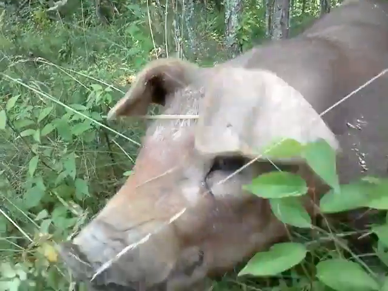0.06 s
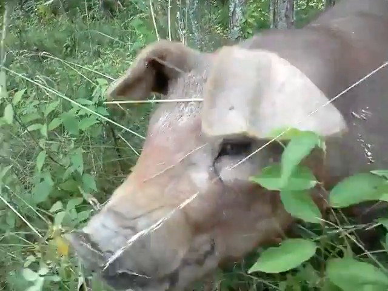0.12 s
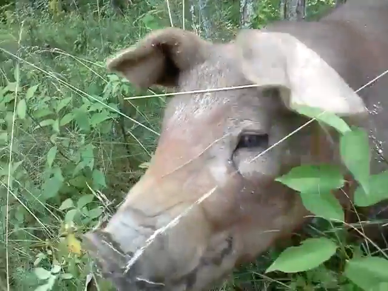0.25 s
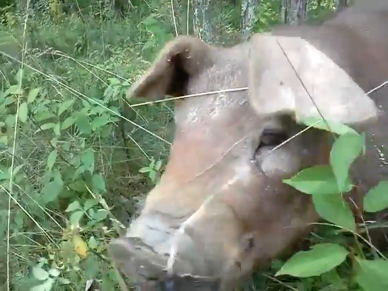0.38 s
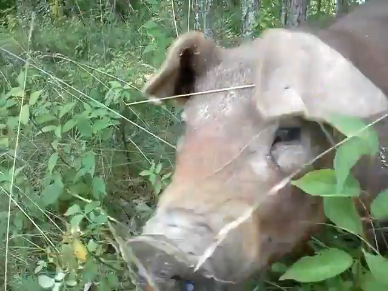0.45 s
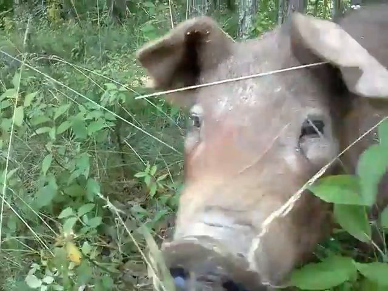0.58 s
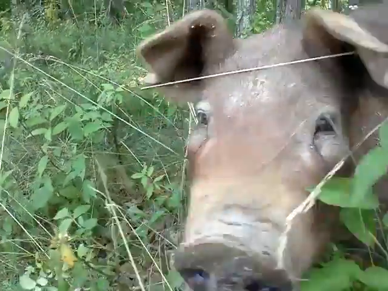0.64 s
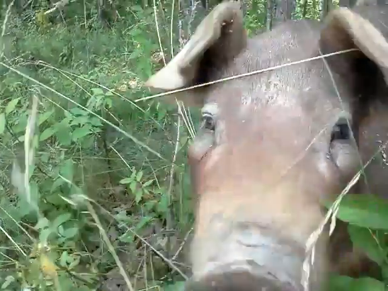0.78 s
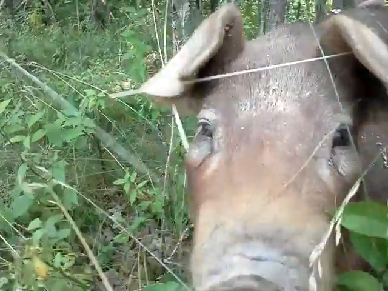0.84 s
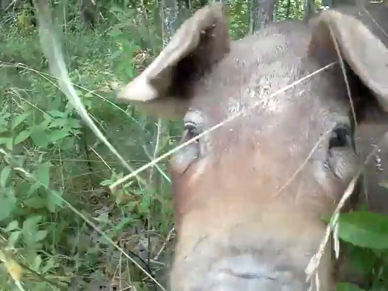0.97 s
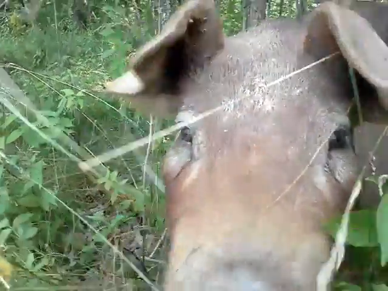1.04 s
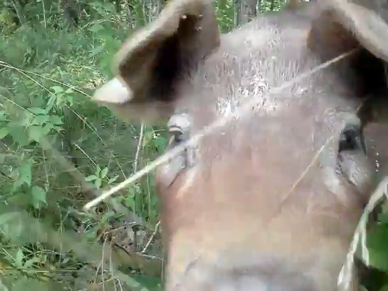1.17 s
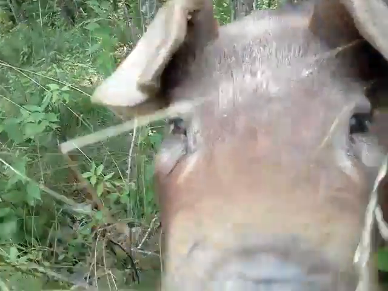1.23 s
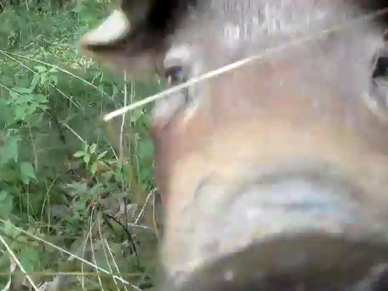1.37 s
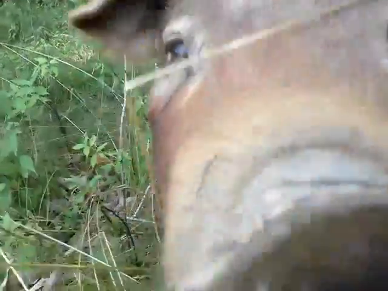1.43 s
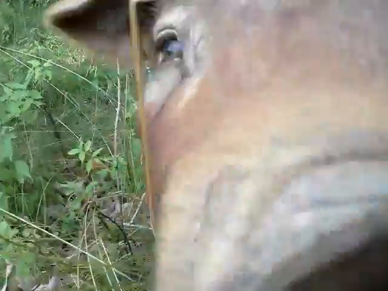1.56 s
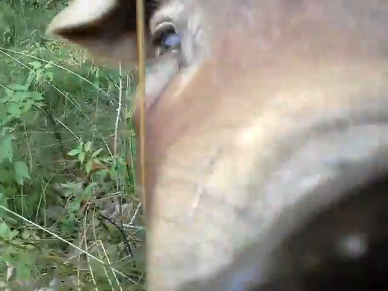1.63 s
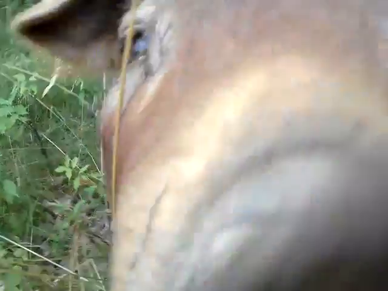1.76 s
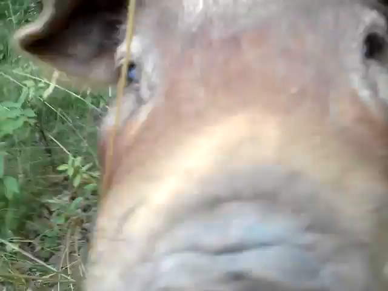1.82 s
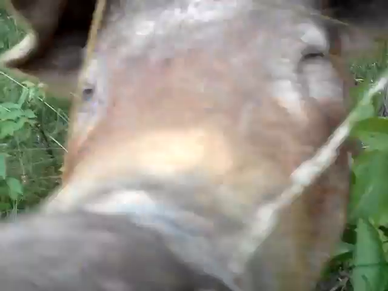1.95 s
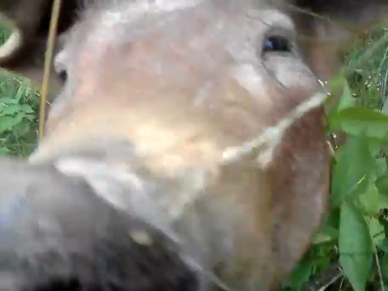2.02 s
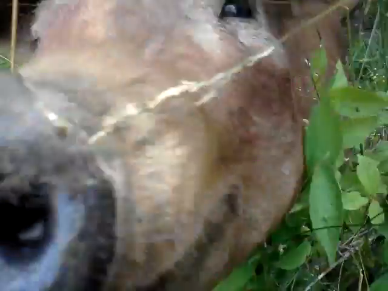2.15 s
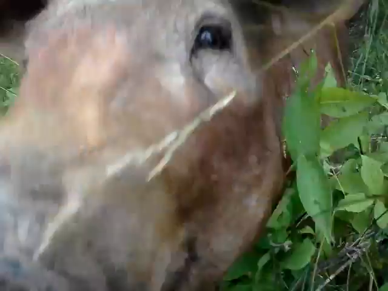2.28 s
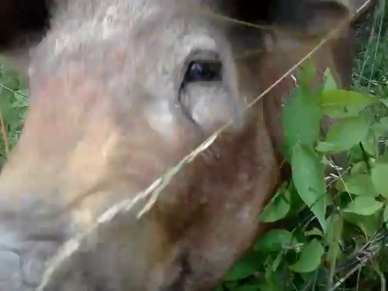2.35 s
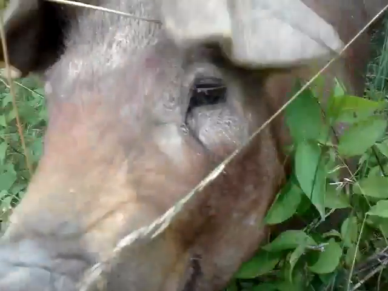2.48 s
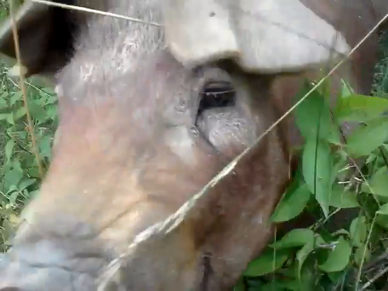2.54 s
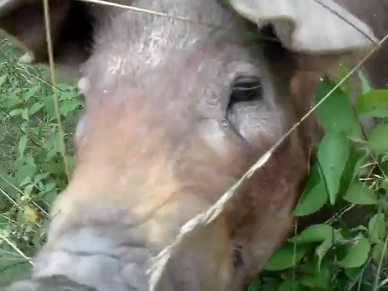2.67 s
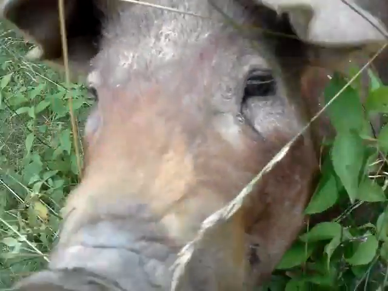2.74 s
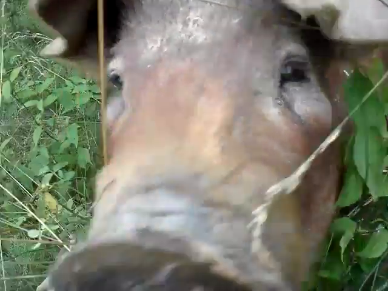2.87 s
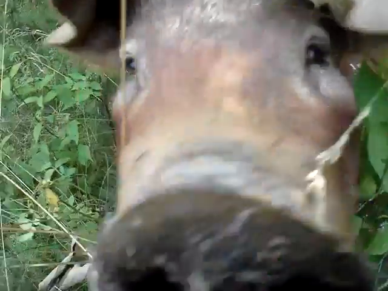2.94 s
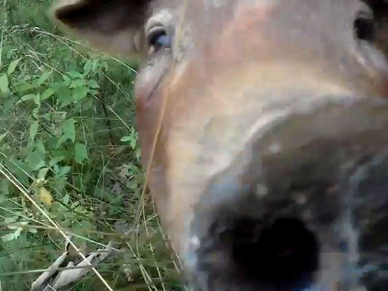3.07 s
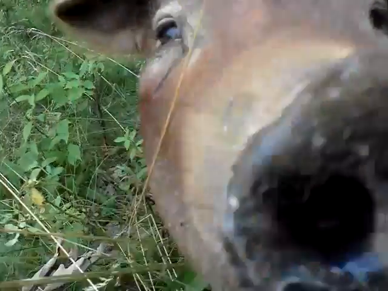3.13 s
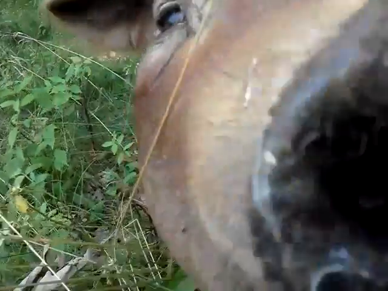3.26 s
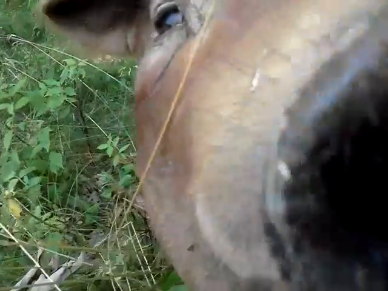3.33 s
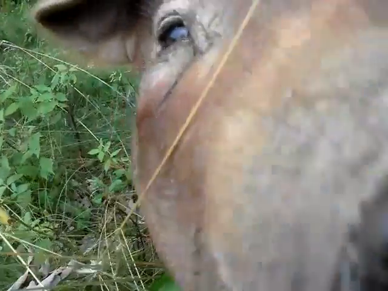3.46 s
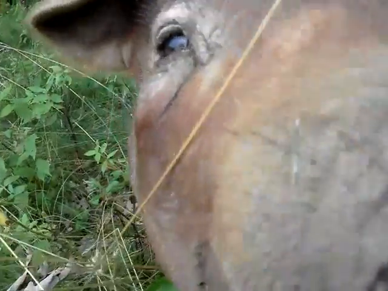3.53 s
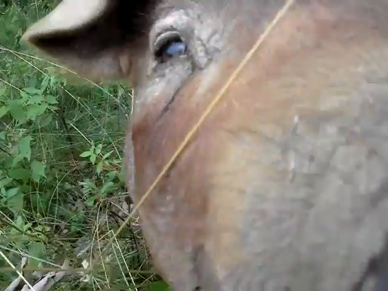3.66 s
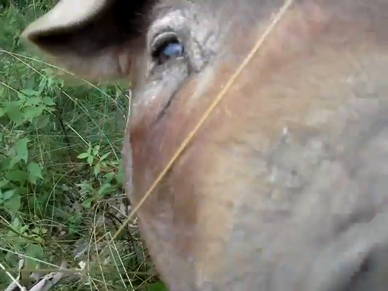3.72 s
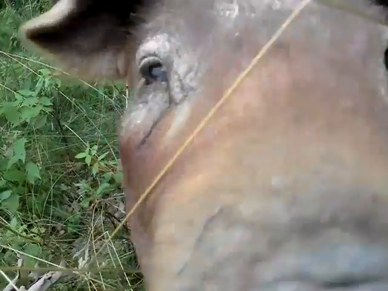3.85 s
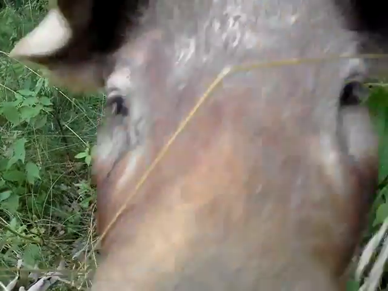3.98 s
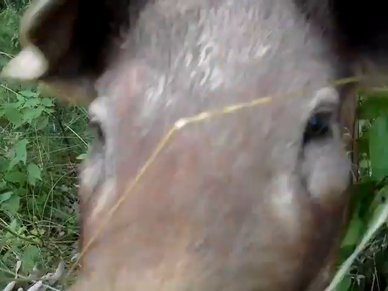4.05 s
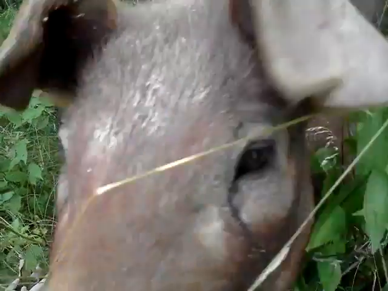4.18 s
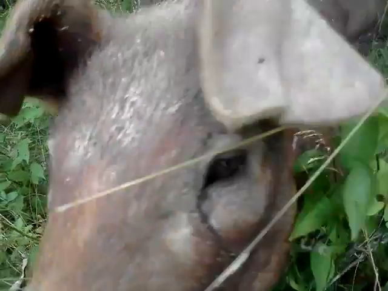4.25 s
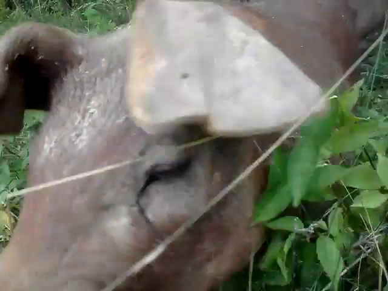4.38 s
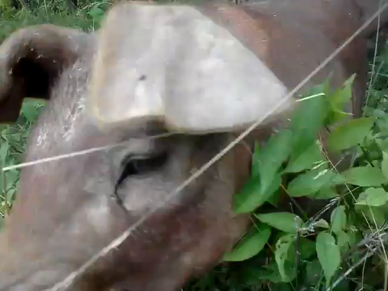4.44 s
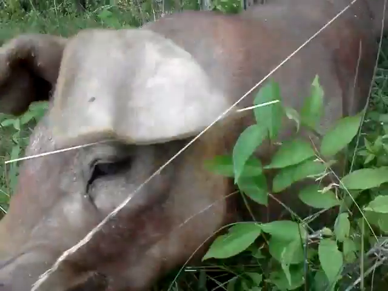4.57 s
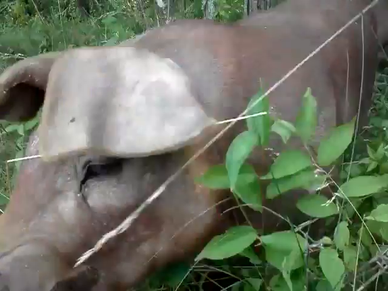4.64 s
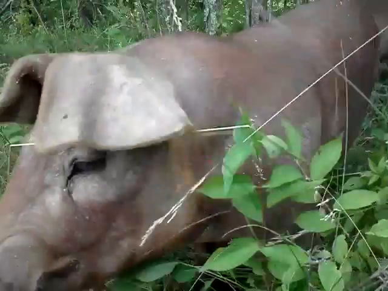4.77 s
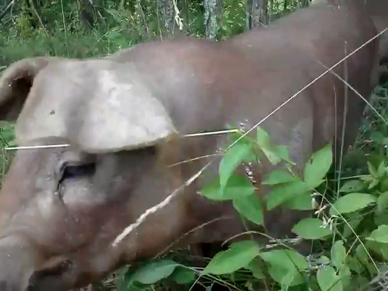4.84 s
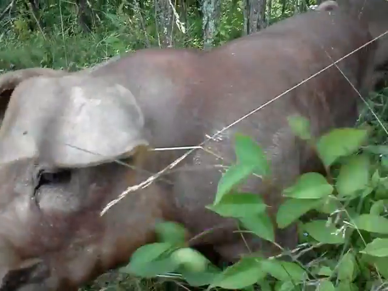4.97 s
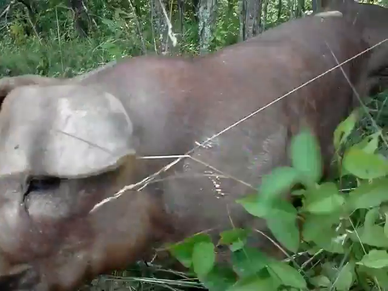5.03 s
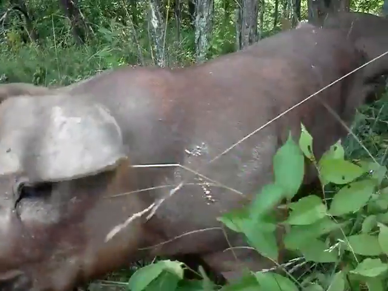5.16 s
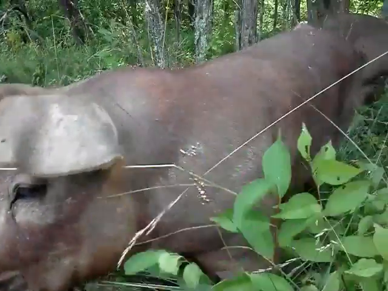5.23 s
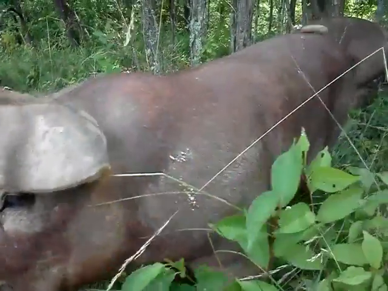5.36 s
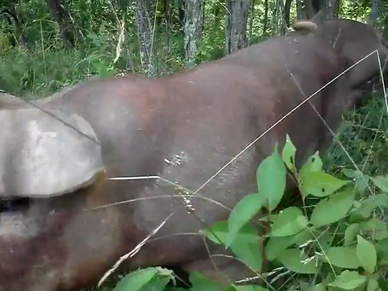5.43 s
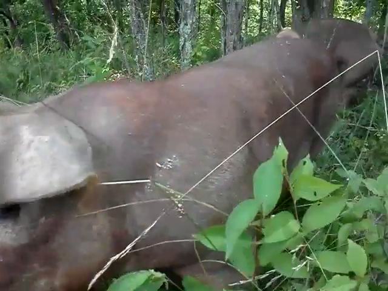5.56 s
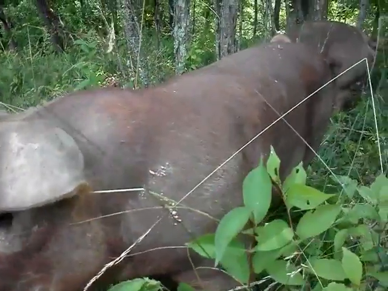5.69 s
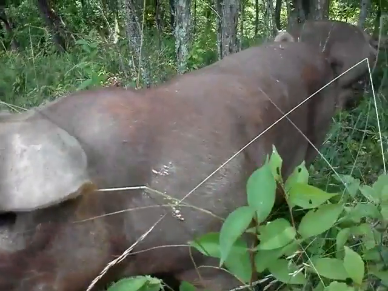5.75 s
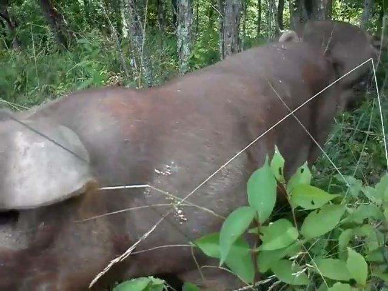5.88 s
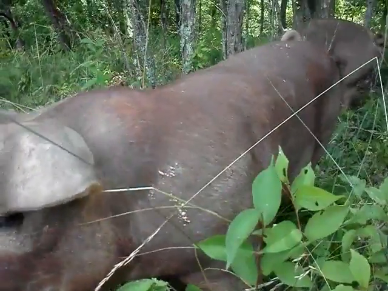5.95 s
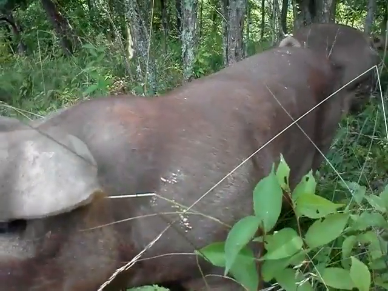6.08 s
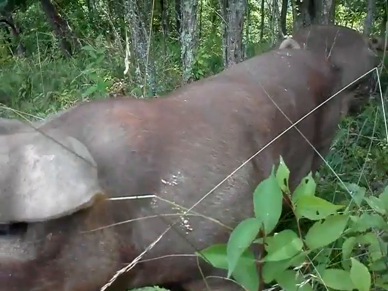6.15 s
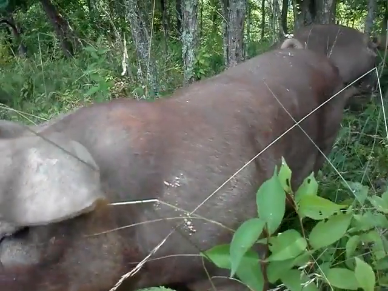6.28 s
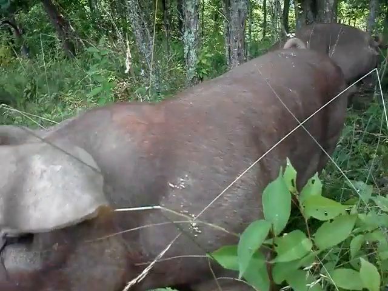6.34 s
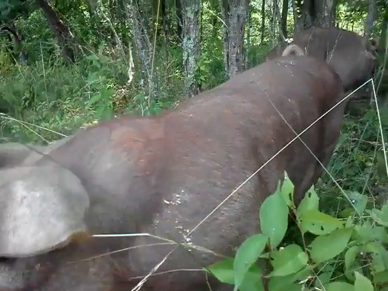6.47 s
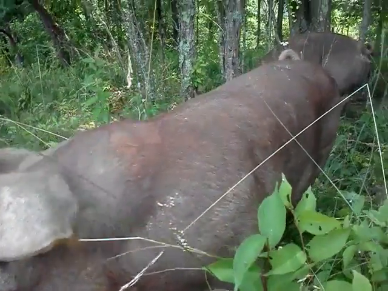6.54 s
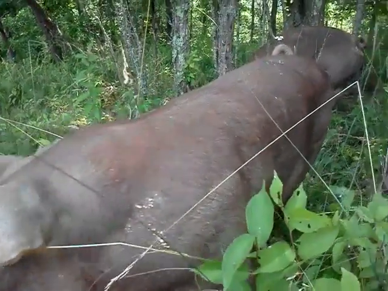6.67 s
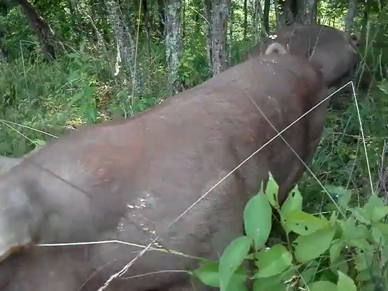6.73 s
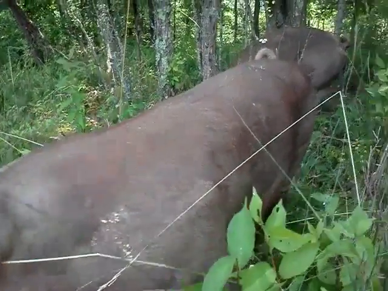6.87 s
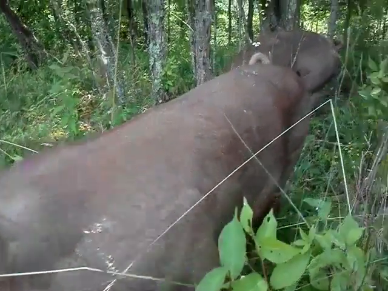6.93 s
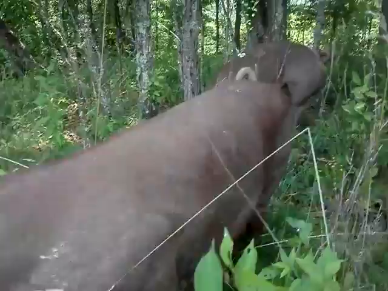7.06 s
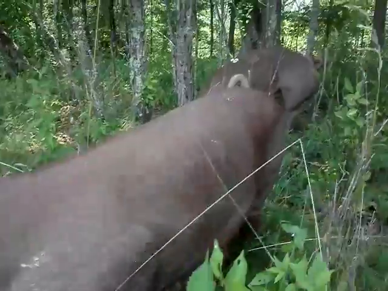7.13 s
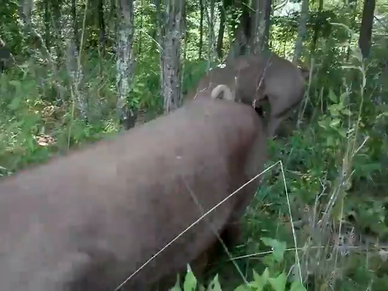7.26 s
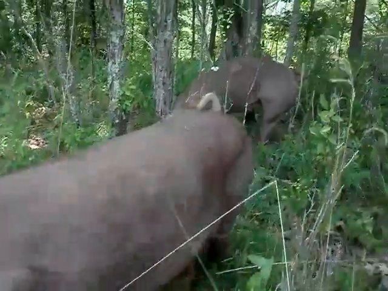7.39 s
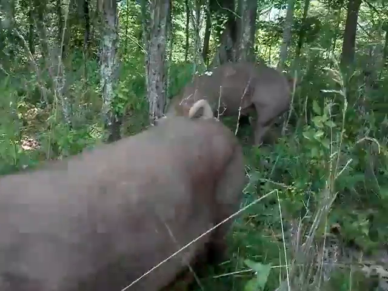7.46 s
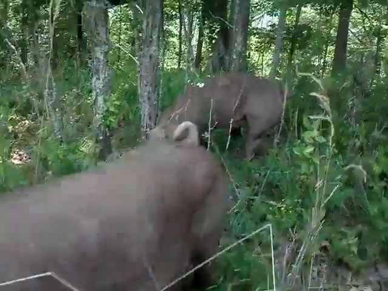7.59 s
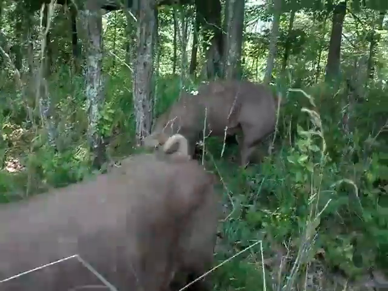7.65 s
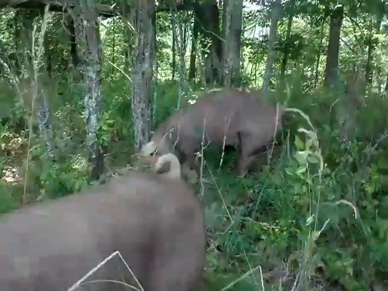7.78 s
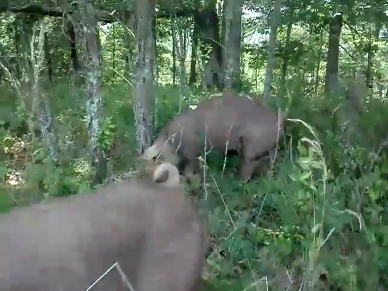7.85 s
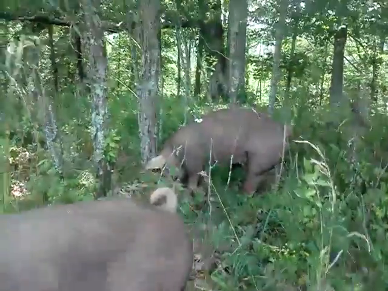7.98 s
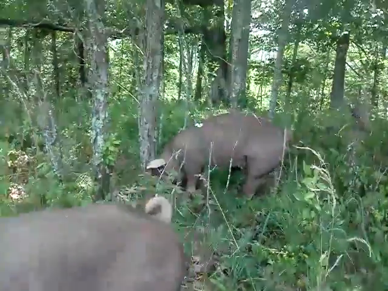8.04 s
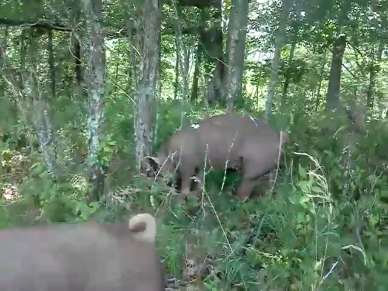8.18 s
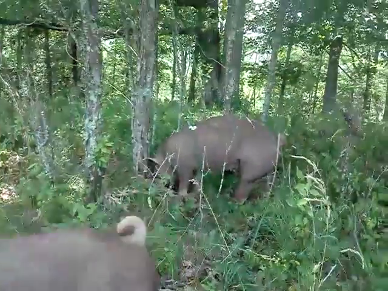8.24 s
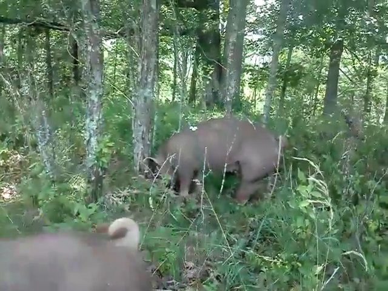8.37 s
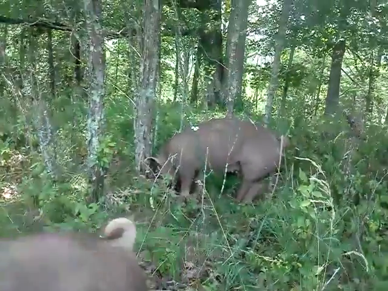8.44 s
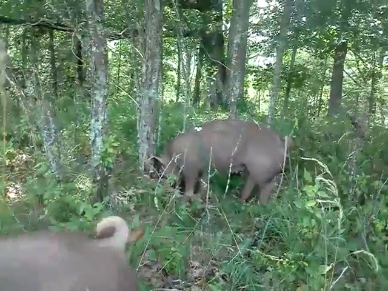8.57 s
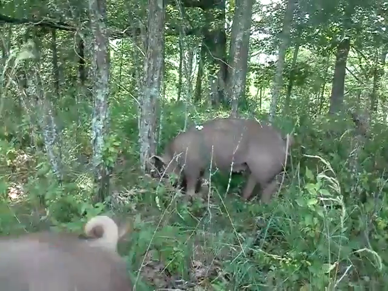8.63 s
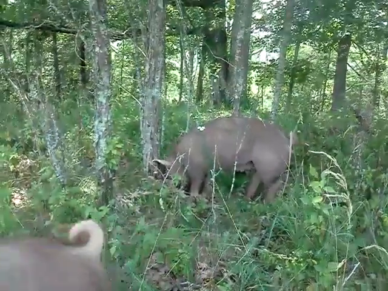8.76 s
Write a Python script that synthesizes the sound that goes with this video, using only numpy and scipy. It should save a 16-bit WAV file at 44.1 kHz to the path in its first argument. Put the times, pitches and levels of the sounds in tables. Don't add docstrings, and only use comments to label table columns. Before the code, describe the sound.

Very close to a small microphone in woodland undergrowth, a pig sniffs softly, then snorts in hollow, hissing bursts. A short creaky grunt leads into loud leaf crackle and a dense run of sharp stem snaps. More heavy snorts follow, then calmer rustling, a few sniffs, another grunt and renewed snapping as the animal moves past. Faint bird notes and a shuffling herd lie behind. Loud peaks distort.

```python
import sys
import numpy as np
from scipy import signal
from scipy.fft import rfft, irfft
from scipy.io import wavfile

SR = 44100
rng = np.random.default_rng(int(sys.argv[2]) if len(sys.argv) > 2 else 0)


def wrap_up_sound(samples):
    columns = np.atleast_2d(samples).T
    tamed = np.clip(columns, -1, 1)
    steps = np.round(tamed * 32767).astype(np.int16)
    wavfile.write(sys.argv[1], SR, steps)


def boost_factor(decibels):
    exponent = np.asarray(decibels, float) / 20
    return 10 ** exponent


N = 388521

# start_s, length_s, tone_db, hold_change_db, jet_rel_db
SNORTS = [(0.133, 0.21, -38, -2, -2), (0.493, 0.15, -43, -1.5, -1), (0.775, .14, -37.5, -0.8, 2.5),
          (1.116, .1, -31.5, 2, -2.5), (1.39, .13, -29, 7, 0.5), (1.914, 0.15, -17, -4, -2),
          (2.108, .14, -32, 6.5, -5), (2.392, 0.18, -30, -8.5, -29), (2.708, 0.13, -42.5, -1, -9),
          (3.026, 0.1, -35.5, -0.3, -0.5), (3.463, 0.19, -16.5, -4, -0.5), (3.633, 0.071, -44.5, -5, 7),
          (3.881, .19, -26, -7.5, -1), (4.182, 0.15, -44, -1, -3), (4.449, 0.26, -43, -8.5, 2),
          (5.674, 0.11, -48, 4, -4)]
SNORT_ATTACK_S, SNORT_RELEASE_S, SNORT_ENTRY_DB, SNORT_EXIT_DB = 0.038, 0.046, -15.5, -25.5
# start_s, peak_s, end_s, hiss_db
SNIFFS = [
    (0.0, .104, 0.11, -41),
    (.34, .36, 0.485, -42.5),
    (.64, .7, 0.88, -36),
    (.9, .95, 1.01, -32.5),
    (3.125, 3.14, 3.53, -31.5),
    (3.648, 3.668, 3.73, -34),
    (6.4, 6.488, 6.58, -42),
    (6.62, 6.656, 6.84, -34.5),
]
# pitch_hz, width_hz, level_db
SNOUT_MODES = [(266.3, 57, -3), (366.6, 74, -0.5), (396, 107, -3)]
# pitch_hz, width_hz, level_db
FLARE_MODES = [(538, 250, -8), (774, 274, 4.5), (1030, 220, 4.5)]
# pitch_hz, width_hz, level_db
NOSTRIL_MODES = [(1950, 270, -6), (2560, 180, -1.5), (3380, 460, 3), (4070, 540, 3), (4890, 830, 3),
                 (6000, 1400, -5), (7220, 400, -7)]
FLARE_REL_DB = -6

# closure_s, chest_db, throat_rel_db, slap_rel_db
GLOTTAL_PULSES = [
    (1.057, -6, -17, -14),
    (1.084, -10, 10, 10),
    (6.844, -30.5, -26, -17),
    (6.867, -13.5, -4, -1.5),
    (6.896, -9.5, -4.5, -0.5),
    (8.175, -22, -13, -22),
    (8.1982, -17, -4.5, 3.5),
    (8.225, -13, -0.5, -5),
]
# pitch_hz, t60_s
CHEST_MODE = (218, .06)
# pitch_hz, level_db, t60_s
THROAT_MODES = [(318, -13, 0.034), (430, -14, 0.053), (596, -19.5, 0.058), (716, -7.5, 0.059)]
# pitch_hz, level_db, t60_s
MOUTH_MODES = [(1100, -1.5, 0.018), (1580, -3, 0.025), (2000, -0.5, 0.017), (2560, -4, 0.0093)]

# pitch_hz, level_db_per_hz
LEAF_SPECTRUM = [(1180, -23.5), (2000, -21), (2680, -10.5), (2960, -6), (4710, -1.5), (5560, -3),
                 (6910, -2.5), (7680, -7), (8800, -13.5), (11400, -54), (19400, -120)]
# pitch_hz, level_db_per_hz
STEM_SPECTRUM = [(180, -44.5), (300, -26), (379, -28.5), (555, -12), (714, -17), (856, -9), (2600, 2.5),
                 (3380, -15), (5720, -120)]
# time_s, level_db, stems_rel_db
STIR = [(0, -46.5, -12), (.49, -50.5, -12), (.64, -45.5, -8), (1.0, -33.5, -9), (1.25, -34, -10),
        (1.8, -36, -8), (1.89, -32, -9), (2.55, -35.5, -5), (2.89, -43.5, -9.5), (3.14, -45, -7),
        (3.43, -37.5, -6), (3.76, -45, -11), (4.17, -51, -9), (4.78, -35.5, -10), (5.4, -45, -6),
        (6.3, -51, -10), (6.85, -39, -11.5), (8.81, -32.5, -16)]
# start_s, peak_s, end_s, level_db, stems_rel_db
DRAGS = [(1.055, 1.09, 1.14, -15, -12), (1.08, 1.13, 1.23, -12, -9.5), (1.13, 1.185, 1.246, -19, -10.5),
         (1.26, 1.326, 1.4, -29.5, -6.5), (1.49, 1.57, 1.77, -25, -10), (1.87, 1.925, 1.964, -29.5, -13),
         (2.03, 2.14, 2.183, -24.5, -2.5), (2.2, 2.4, 2.54, -18, -5), (3.47, 3.545, 3.6, -16.5, -18),
         (3.79, 3.838, 3.93, -31.5, -11), (4.05, 4.095, 4.1, -38.5, -14), (4.28, 4.33, 4.72, -28, -7.5),
         (4.4, 4.65, 4.7, -23, -12.5), (4.95, 5.064, 5.23, -35, -41), (5.74, 5.88, 5.99, -49, -17),
         (6.0, 6.094, 6.28, -41, -36), (6.32, 6.488, 6.66, -37.5, -15), (6.94, 7.085, 7.2, -21.5, -8.5),
         (7.06, 7.175, 7.27, -22, -7), (7.27, 7.405, 7.68, -19, -9.5), (7.8, 7.974, 8.06, -28, -9.5),
         (8.2, 8.288, 8.45, -27.5, -10.5), (8.5, 8.75, 8.5, -43, -16)]
# time_s, level_db
FLICKS = [(.098, -44), (1.283, -25.5), (1.724, -32), (1.765, -31), (1.858, -41), (2.061, -21),
          (2.522, -26.5), (2.95, -38.5), (4.496, -30), (4.703, -22.5), (4.774, -41), (4.99, -36),
          (5.345, -42), (5.55, -47), (6.181, -40), (6.72, -34), (6.995, -40), (7.555, -37), (8.62, -32),
          (7.697, -26), (8.031, -49)]
FLICK_RISE_S, FLICK_FALL_S, FLICK_STEMS_REL_DB = 0.003, 0.022, -11.5
BLOWN_LEAVES_REL_DB, BLOWN_STEMS_REL_DB = -2, -7

# time_s, peak_db, pitch_hz
SNAPS = [(1.242, -12, 2090), (1.282, -15, 3500), (1.2918, -9, 1660), (1.3274, -10, 3420),
         (1.3329, -2, 5550), (1.558, -5, 3430), (1.566, -4, 4140), (1.5746, -4.5, 3310), (1.7015, -7, 4020),
         (1.729, -8, 4600), (2.0588, -8.5, 1790), (2.127, -13, 2010), (2.1508, -6.5, 3870),
         (2.2476, -3.5, 4500), (2.3131, -3, 4030), (1.127, -2.5, 5500), (2.396, -1, 6300),
         (2.4129, -5.5, 3140), (2.5181, -5, 5520), (2.5207, -3.5, 3700), (2.6522, -6, 5300),
         (4.6369, -8.5, 5370), (4.7711, -9.5, 5470), (6.9949, -7, 5200), (7.1686, -10, 4800),
         (7.3944, -2, 4630), (7.5537, -11, 4300), (7.6974, -11.5, 4470), (8.0305, -5.5, 5660),
         (8.6719, -7.5, 5700)]
# time_s, peak_db
TICKS = [(1.348, -7.5), (1.487, -8), (1.542, -3), (1.661, -11.5), (1.7515, -12), (1.856, -20),
         (2.5336, -11), (2.5637, -15.5), (2.5987, -13), (2.6265, -14), (2.6827, -17.5), (2.7119, -17.5),
         (2.811, -17), (2.8435, -21), (3.2235, -14), (3.4605, -8.5), (4.494, -14), (4.6649, -12),
         (5.1145, -17.5), (5.232, -17.5), (5.2888, -13), (7.065, -10), (7.434, -5.5), (7.5705, -7),
         (7.6016, -10), (7.9786, -21), (8.4057, -13), (8.5343, -17), (8.6068, -24), (6.1807, -23)]
TICK_HZ, TICK_SPREAD_OCT = 4460, 0.6

# time_s, pitch_hz, level_db
HOOTS = [
    [(0.39, 712.6, -62), (0.438, 706, -53), (0.48, 740, -66)],
    [(0.95, 740, -52), (1.02, 697, -53), (1.05, 703.0, -54)],
    [(5.41, 3380, -66), (5.44, 3388, -60), (5.475, 3440, -66)],
    [(5.58, 2880, -64), (5.62, 2900, -60), (5.655, 2880, -66)],
    [(5.69, 2580, -63), (5.72, 2560, -58), (5.76, 2550, -64)],
]
# time_s, level_db
HERD = [(0.0, -56), (0.56, -55), (1.23, -50.5), (1.77, -50), (2.33, -40.5), (2.55, -51), (4.22, -64),
        (4.46, -59), (4.93, -51.5), (5.54, -46.5), (6.01, -54.5), (6.89, -48.5), (7.02, -46), (7.95, -50.5),
        (8.44, -47.5), (8.81, -50)]
# pitch_hz, level_db_per_hz
WOOD_SPECTRUM = [(12, -37), (20, -0.5), (96, -1.5), (170, -3), (305, -2.5), (401, -5.5), (801, -9.5),
                 (889, -4.5), (1530, -7.5), (3000, -3.5), (3900, -35.5), (6600, -120)]
WOOD_DB = -51


def rms_one(x):
    return x / np.sqrt(np.mean(x ** 2) + 1e-20)


def butter(x, order, hz, kind):
    return signal.sosfilt(signal.butter(order, hz, kind, fs=SR, output="sos"), x)


def in_time(rows):
    time_s, *columns = np.transpose(rows)
    return [np.interp(np.arange(N) / SR, time_s, c) for c in columns]


def drift(rate_hz):
    r = np.exp(-2 * np.pi * rate_hz / SR)
    return rms_one(signal.lfilter([1], [1, -2 * r, r * r], rng.standard_normal(N + SR))[SR:])


def coloured(x, spectrum):
    hz, level_db = np.transpose(spectrum)
    grid_hz = np.arange(1, N // 2 + 2) * SR / N
    gain = boost_factor(np.interp(np.log(grid_hz), np.log(hz), level_db))
    return rms_one(irfft(rfft(x) * gain, N))


def resonances(x, modes):
    out = 0
    for k, (hz, width_hz, level_db) in enumerate(modes):
        r = np.exp(-np.pi * width_hz / SR)
        zeros = [(1 - r * r) / 2, 0, (r * r - 1) / 2]
        poles = [1, -2 * r * np.cos(2 * np.pi * hz / SR), r * r]
        out = out + (-1) ** k * boost_factor(level_db) * signal.lfilter(zeros, poles, x)
    return rms_one(out)


def ring(clicks, hz, t60_s):
    r = boost_factor(-60 / (t60_s * SR))
    w = 2 * np.pi * hz / SR
    return signal.lfilter([0, np.sin(w)], [1, -2 * r * np.cos(w), r * r], clicks + 1e-18)


def swell(tables, column, edge_s):
    out, t = np.zeros(N), np.arange(N) / SR
    for rows in tables:
        rows = np.transpose(rows)
        time_s, level_db = rows[0], rows[1]
        if column > 1:
            level_db = level_db + rows[column]
        edge = np.clip(np.minimum(t - time_s[0], time_s[-1] - t) / edge_s, 0, 1)
        out += edge * boost_factor(np.interp(t, time_s, level_db))
    return out


def strokes(rows, entry_db, exit_db):
    return [[(start, db + entry_db, *more), (peak, db, *more), (end, db + exit_db, *more)]
            for start, peak, end, db, *more in rows]


def breath():
    tables = []
    for start, length, db, change_db, jet_db in SNORTS:
        hold_end = start + max(length - SNORT_RELEASE_S, SNORT_ATTACK_S + 0.002)
        end_db = db + change_db
        tables.append([(start, db + SNORT_ENTRY_DB, jet_db), (start + SNORT_ATTACK_S, db, jet_db),
                       (hold_end, end_db, jet_db), (start + length, end_db + SNORT_EXIT_DB, jet_db)])
    return tables


def snorts():
    flutter = drift(43)
    air = rng.standard_normal(N) * boost_factor(2.0 * flutter)
    hollow = butter(resonances(air, SNOUT_MODES), 2, 170, "high")
    puff = rms_one(butter(rng.standard_normal(N), 2, [25, 160], "band"))
    jet = resonances(rng.standard_normal(N), NOSTRIL_MODES) * boost_factor(flutter)
    tone = swell(breath(), column=1, edge_s=0.024) * (hollow + boost_factor(-17) * puff)
    flare = swell(breath(), column=1, edge_s=0.052) * boost_factor(FLARE_REL_DB) * resonances(air, FLARE_MODES)
    sniff_gain = swell(strokes(SNIFFS, entry_db=-8.5, exit_db=-8.5), column=1, edge_s=0.016)
    jet_gain = swell(breath(), column=2, edge_s=0.013)
    return tone + flare + jet * (jet_gain + sniff_gain)


def grunts():
    out, size, lead_s = np.zeros(N), SR // 8, 0.005
    t = np.arange(size) / SR - lead_s
    chance = rng.standard_normal((len(GLOTTAL_PULSES), size))
    for (closure_s, chest_db, throat_db, slap_db), noise in zip(GLOTTAL_PULSES, chance):
        push = np.exp(-((t + 0.00261) / 0.00044) ** 2) / (0.0013 * SR)
        leak = 0.053 * (t > 0) * noise * np.exp(-t / 0.0024)
        slap = np.diff(t > 0, prepend=False) + leak
        shift = 1 + 0.022 * noise[:4]
        pulse = ring(push + 0.065 * slap, *CHEST_MODE)
        for modes, level_db in (THROAT_MODES, throat_db), (MOUTH_MODES, slap_db - 10.5):
            for k, (hz, db, t60_s) in enumerate(modes):
                pulse += boost_factor(level_db + db) * ring(slap, hz * shift[k], t60_s)
        at = round((closure_s - lead_s) * SR)
        out[at:at + size] += boost_factor(chest_db) * pulse
    return butter(butter(out, 4, 2800, "low"), 2, 110, "high")


def crackle(per_s, spread_db, clump_db, smooth, low_hz, high_hz, cycles):
    born = rng.random(N) < per_s * boost_factor(clump_db * drift(60)) / SR
    sizes = boost_factor(spread_db * np.minimum(rng.exponential(1, N), 3.0)) * rng.choice([-1, 1], N)
    dealt = rng.integers(0, 8, N)
    grains = np.zeros(N)
    for k, hz in enumerate(np.geomspace(low_hz, high_hz, 8)):
        grains += ring(born * sizes * (dealt == k), hz, cycles / hz)
    friction = butter(rng.standard_normal(N), 1, [low_hz, high_hz], "band")
    return rms_one(grains) + smooth * rms_one(friction)


def rustle():
    leaf_db, stem_rel_db = in_time(STIR)
    flicks = [(s - FLICK_RISE_S, s, s + FLICK_FALL_S, db, FLICK_STEMS_REL_DB) for s, db in FLICKS]
    drags = strokes(DRAGS, entry_db=-19, exit_db=-21.5)
    whips = strokes(flicks, entry_db=-12.0, exit_db=-22.5)
    bright, dull = (swell(drags, c, edge_s=0.023) + swell(whips, c, edge_s=0.0027) for c in (1, 2))
    blown = boost_factor(BLOWN_LEAVES_REL_DB) * swell(breath(), column=2, edge_s=0.0086)
    leaf_gain = boost_factor(leaf_db) + bright + blown
    stem_gain = boost_factor(leaf_db + stem_rel_db) + dull + boost_factor(BLOWN_STEMS_REL_DB) * blown
    leaves = crackle(per_s=1700, spread_db=4.0, clump_db=7, smooth=0.76, low_hz=2210, high_hz=8300, cycles=3.75)
    stems = crackle(per_s=700, spread_db=4.5, clump_db=4.5, smooth=0.91, low_hz=504, high_hz=2560, cycles=5.5)
    mix = leaf_gain * coloured(leaves, LEAF_SPECTRUM) + stem_gain * coloured(stems, STEM_SPECTRUM)
    return boost_factor(0.96 * drift(18)) * mix


def snaps():
    bright, dull = np.zeros(N + SR), np.zeros(N + SR)
    t = np.arange(SR // 20) / SR
    ticks = [(s, db, TICK_HZ * 2 ** (TICK_SPREAD_OCT * rng.uniform(-1.2, 1))) for s, db in TICKS]
    breaks = SNAPS + ticks
    splinter = rng.standard_normal((len(breaks), len(t)))
    fade = np.exp(-t / 0.0036)
    for (time_s, peak_db, hz), noise in zip(breaks, splinter):
        frayed = boost_factor(5.0 * np.tanh(noise[0]))
        at = round(time_s * SR)
        tick = np.sin(2 * np.pi * hz * t) * np.exp(-t / 0.00032)
        tail = rms_one(ring(noise, hz, 3.6 / hz)) + 0.5 * noise
        bright[at:at + len(t)] += boost_factor(peak_db + 3.0) * (tick + 0.13 * frayed * tail * fade)
        dull[at:at + len(t)] += boost_factor(peak_db - 18) * noise * fade
    return (butter(bright, 3, 1200, "high") + butter(dull, 2, [400, 1600], "band"))[:N]


def hoots():
    out, t = np.zeros(N), np.arange(N) / SR
    for rows in HOOTS:
        time_s, hz, level_db = np.transpose(rows)
        edge = np.clip(np.minimum(t - time_s[0], time_s[-1] - t) / 0.014, 0, 1)
        phase = 2 * np.pi * np.cumsum(np.interp(t, time_s, hz)) / SR
        out += edge * boost_factor(np.interp(t, time_s, level_db) + 3) * np.sin(phase)
    return out * boost_factor(2 * drift(30))


def woodland():
    patchy_db = 2.5 * drift(3.7)
    hush = boost_factor(WOOD_DB - 1.5 + patchy_db) * coloured(rng.standard_normal(N), WOOD_SPECTRUM)
    murmur = resonances(rng.standard_normal(N), [(230, 120, 1), (590, 380, -3.5)])
    unsteady_db = 2.5 * drift(12)
    return hush + boost_factor(in_time(HERD)[0] - 6.5 + unsteady_db) * murmur


def scene():
    return (snorts() + grunts() + rustle() + snaps() + hoots() + woodland())[None]


def top_cut(x):
    return signal.sosfilt(signal.butter(12, 15400, fs=SR, output="sos"), x)


def record(dry):
    rounded = 0.81 * np.tanh(dry / 0.83)
    low_pass = signal.cheby2(14, 85, 9620 + 350, fs=SR, output="sos")
    narrow = signal.sosfilt(low_pass, rounded)
    clipped = np.clip(narrow, -0.69, 0.69)
    return top_cut(clipped)


dry = scene()
out = record(dry)
wrap_up_sound(out)
```